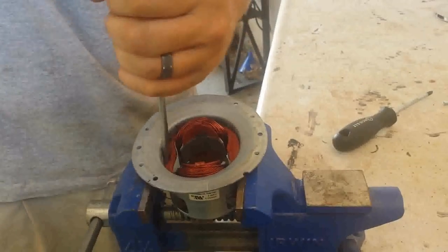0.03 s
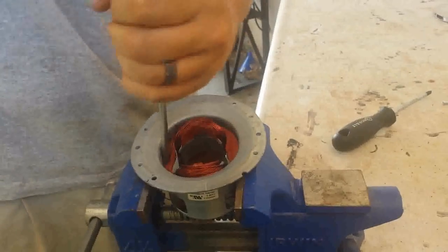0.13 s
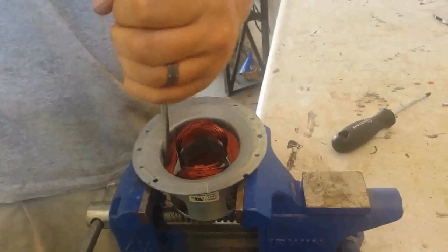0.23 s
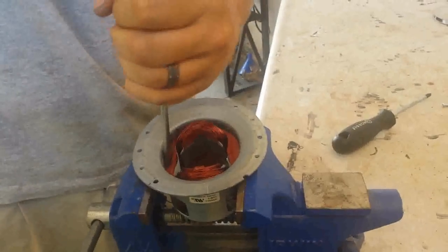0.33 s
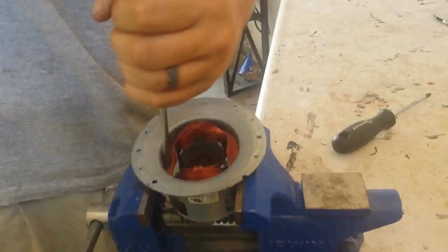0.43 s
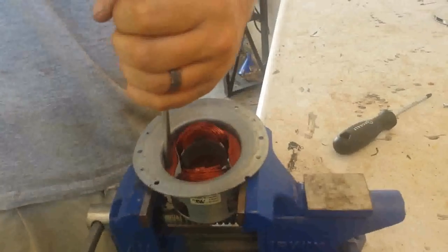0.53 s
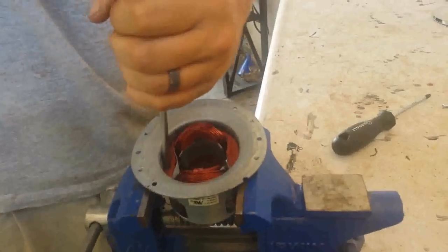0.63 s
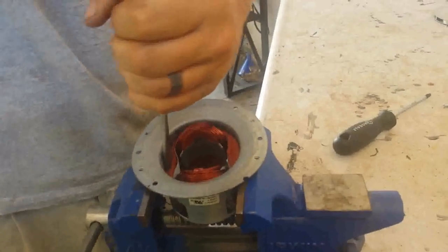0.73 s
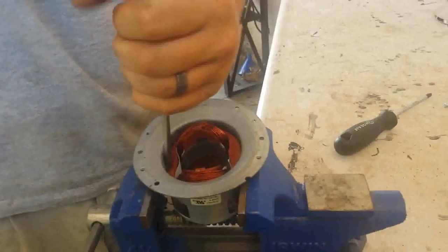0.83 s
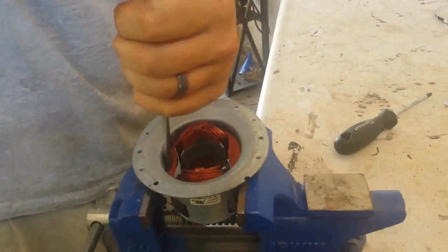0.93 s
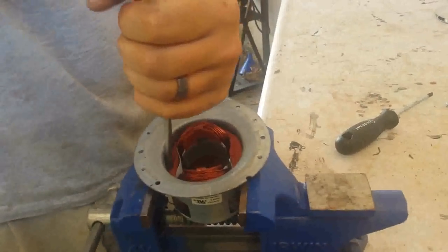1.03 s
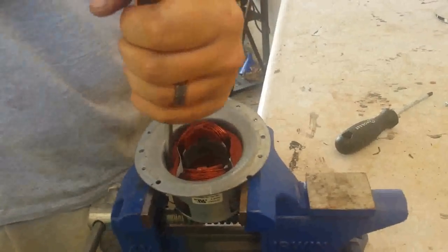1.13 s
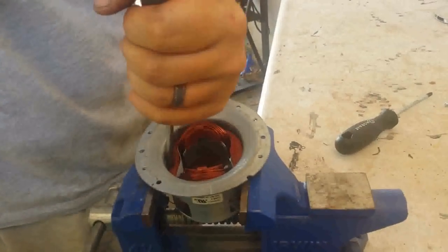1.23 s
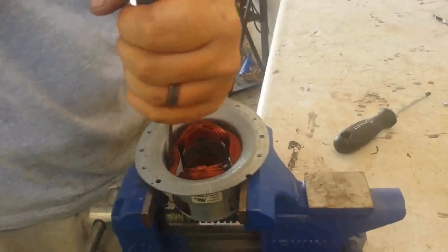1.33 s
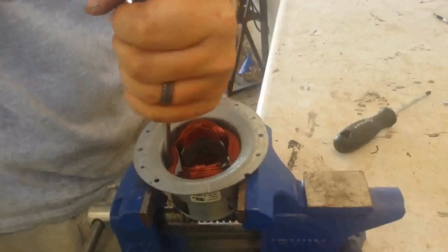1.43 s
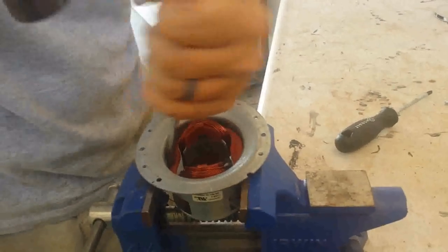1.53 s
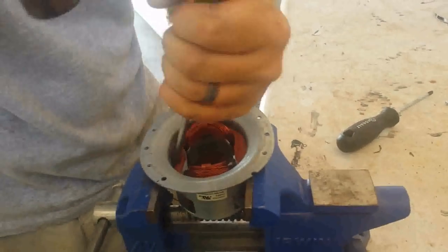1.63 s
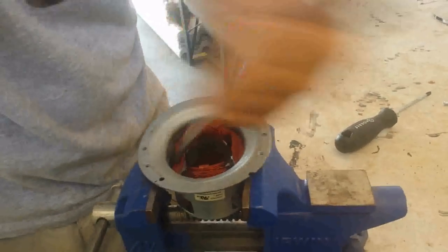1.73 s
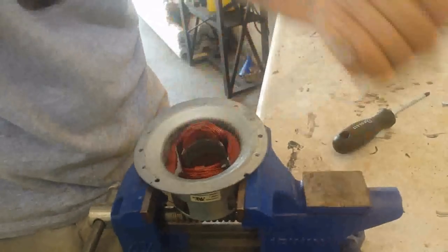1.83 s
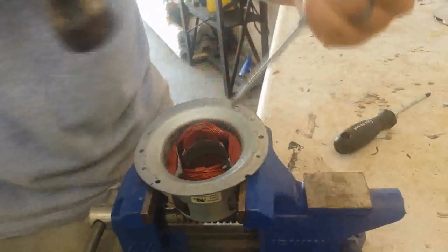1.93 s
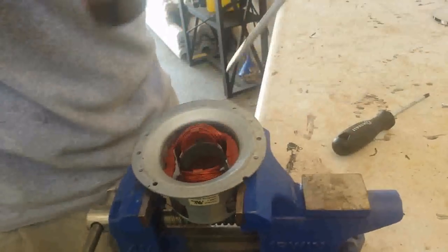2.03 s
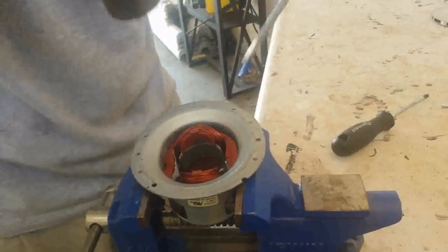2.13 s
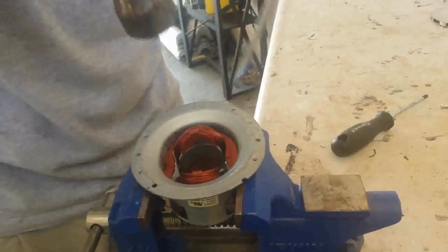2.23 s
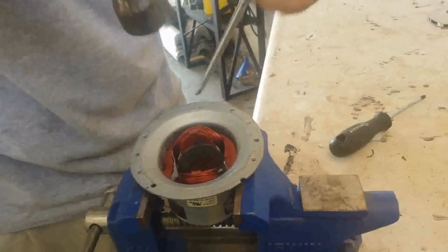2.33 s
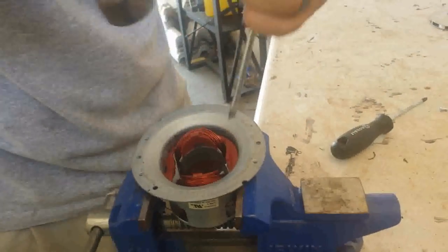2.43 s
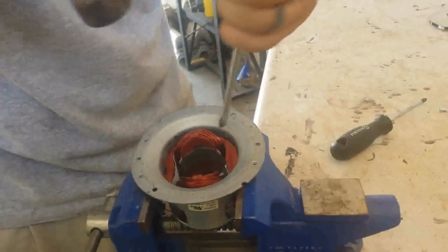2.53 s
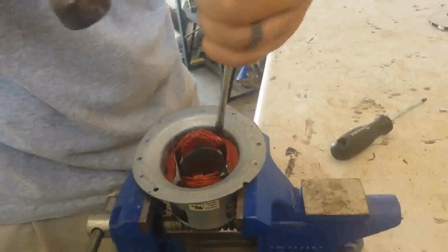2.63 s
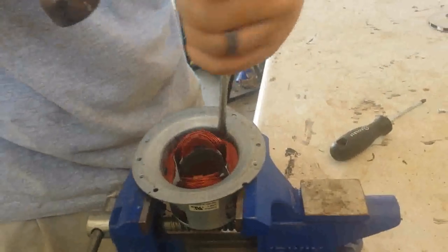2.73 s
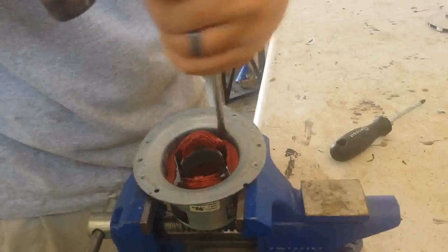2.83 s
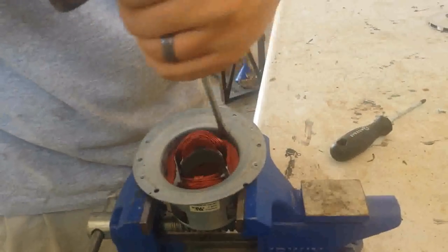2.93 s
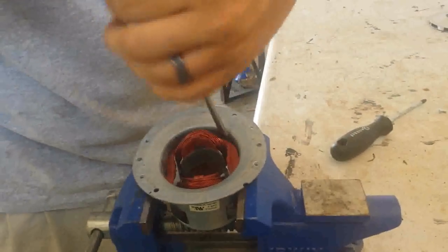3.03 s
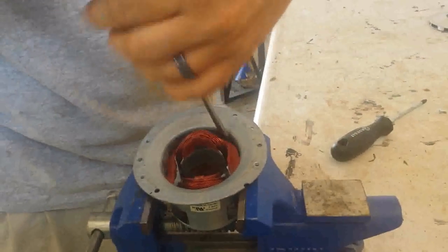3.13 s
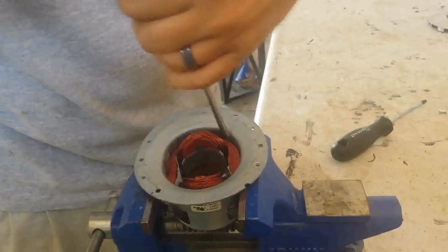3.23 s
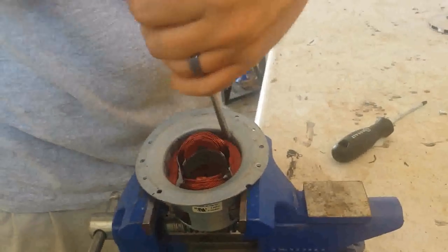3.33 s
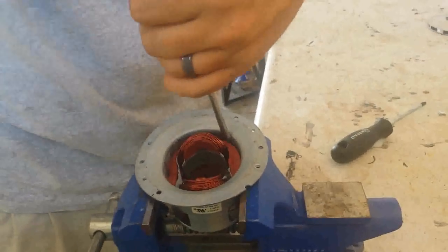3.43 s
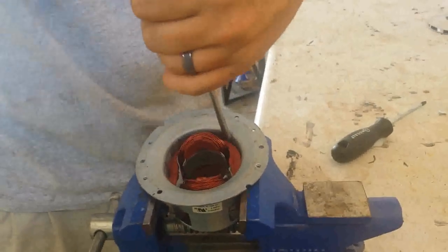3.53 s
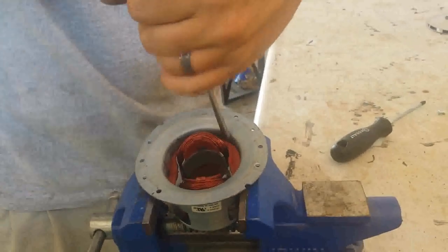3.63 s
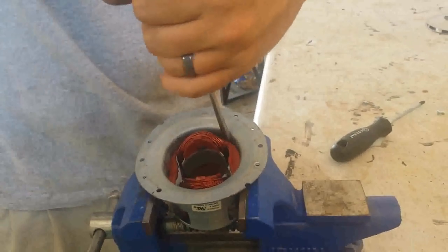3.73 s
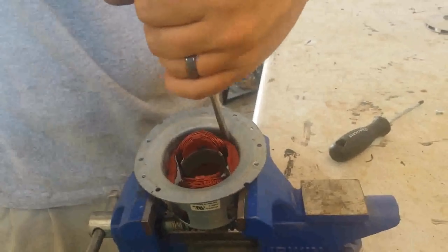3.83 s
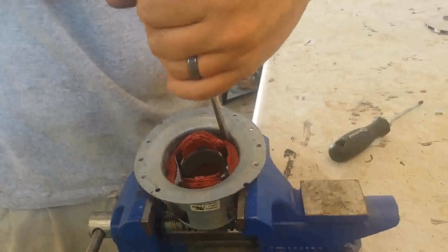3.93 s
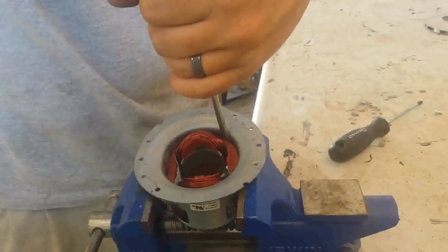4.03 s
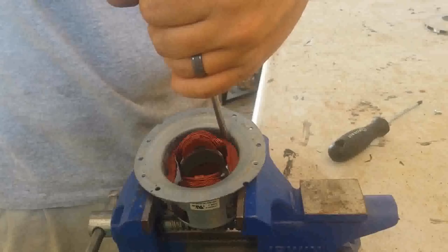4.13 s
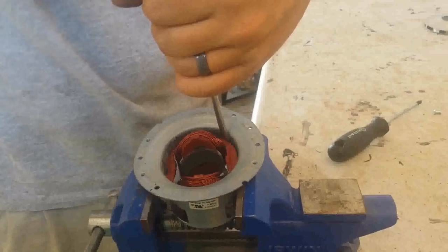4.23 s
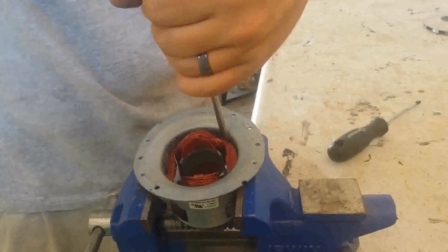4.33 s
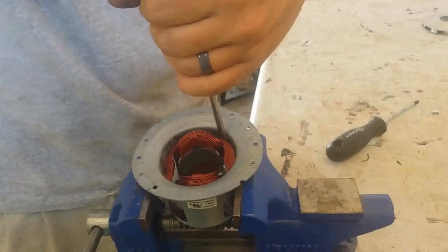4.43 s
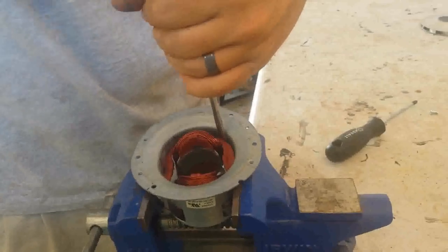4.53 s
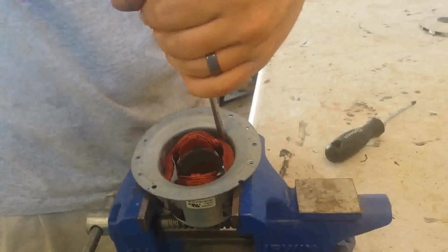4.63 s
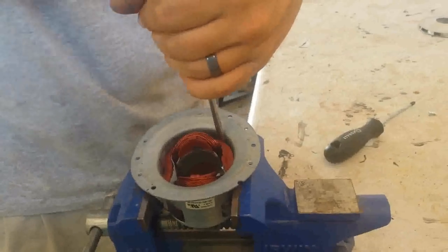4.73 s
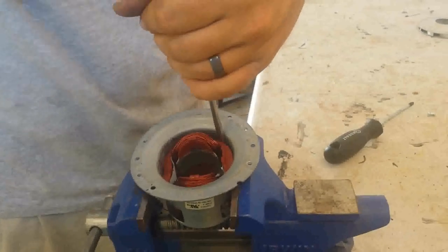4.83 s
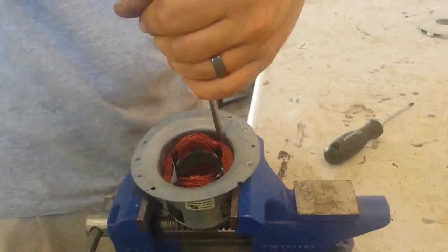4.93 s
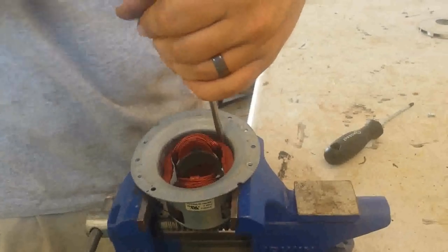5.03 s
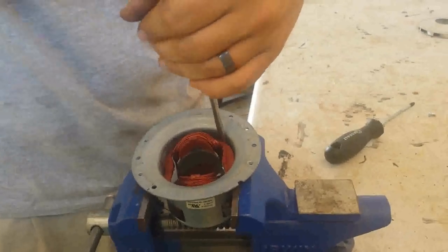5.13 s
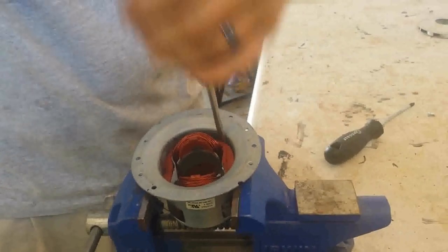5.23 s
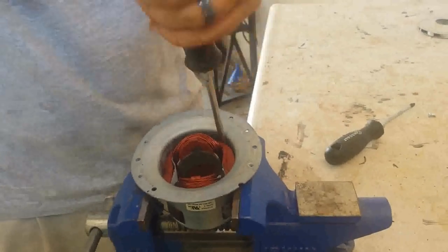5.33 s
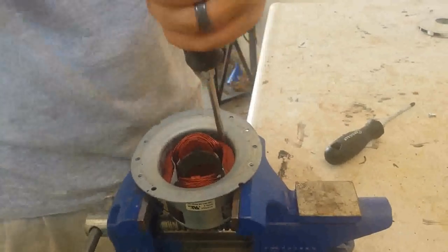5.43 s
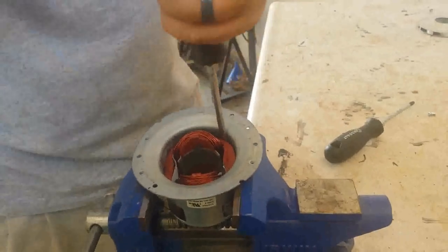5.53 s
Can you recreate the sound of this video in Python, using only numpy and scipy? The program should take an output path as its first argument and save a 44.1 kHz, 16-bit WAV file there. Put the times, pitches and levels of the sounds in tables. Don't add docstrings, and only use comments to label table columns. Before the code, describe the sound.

Very close in a small workshop, a hammer strikes a steel chisel against a metal housing held in a vise. Three even blows crack, thud through the bench and rattle loose parts. The chisel is pulled free with a bright clink, tapped on the rim and dragged lightly. A second run of six blows starts hardest and gradually weakens. A short room echo and soft outdoor wash lie behind.

```python
import sys
import numpy as np
from scipy import signal
from scipy.io import wavfile
from scipy.ndimage import uniform_filter1d

SR = 44100
rng = np.random.default_rng(int(sys.argv[2]) if len(sys.argv) > 2 else 0)


def volts_from_db(level):
    exponent = np.asarray(level, float) / 20
    return 10 ** exponent


def transcribe(signal):
    frames = np.atleast_2d(signal).T
    limited = np.clip(frames, -1, 1)
    pcm = np.round(limited * 32767).astype(np.int16)
    wavfile.write(sys.argv[1], SR, pcm)


N = 246954
LEAD = 8000
ROOMS = 2
SECOND_RUN_S = 2.0

# (time [s], crack peak [dB], bench [dB], housing shake [dB], chisel ring [dB])
BLOWS = [
    (-.072, -8, -20, -31.5, -34),
    (0.207, -6.5, -19, -33.5, -33),
    (0.487, -5, -18.5, -26.5, -49),
    (0.768, -4.5, -22.5, -29, -37.5),
    (3.735, -2, -16, -28.5, -40),
    (4.031, -7, -20, -27, -40),
    (4.304, -6, -21.5, -28.5, -24),
    (4.582, -6.5, -20, -25.5, -43),
    (4.866, -8.5, -21.5, -26, -44),
    (5.144, -10, -20.5, -25.5, -38),
]
# (time [s], peak [dB])
CHATTER = [(0.01, -21), (0.219, -11), (0.2276, -18), (0.2406, -13.5), (0.2614, -23), (0.503, -32),
           (0.516, -16), (0.541, -14.5), (0.555, -13), (0.794, -24), (0.802, -23), (0.8226, -20),
           (3.758, -38), (3.776, -13), (3.789, -16.5), (3.806, -20), (0.528, -18), (4.3078, -15),
           (4.357, -22.5), (3.796, -18), (4.055, -24), (4.0765, -17), (4.096, -18), (4.344, -23),
           (4.371, -18), (4.3974, -25), (4.616, -37), (4.655, -18), (4.8875, -35), (4.9055, -20),
           (4.9382, -22), (5.158, -17), (5.174, -38), (5.199, -18), (5.218, -20.5)]
# (time [s], length [s], level [dB], pitch [Hz])
REBOUNDS = [(-.006, 0.023, -32.5, 5250), (-.006, 0.008, -19.5, 6380), (-.006, 0.024, -33, 1974),
            (0.218, 0.007, -13, 5180), (0.228, 0.0045, -12.5, 5300), (0.242, 0.0045, -16.5, 5220),
            (0.254, 0.0062, -17.5, 5270), (0.504, 0.045, -17, 5216), (0.796, 0.025, -17, 5255),
            (3.757, 0.0049, -19, 5770), (4.075, 0.0081, -21, 5220), (4.339, 0.012, -24, 5250),
            (4.605, 0.043, -26.5, 5160), (4.886, 0.05, -21, 5200), (5.195, 0.012, -20, 5630),
            (5.215, 0.1, -45, 5670), (0.558, 0.0046, -21, 6290), (4.895, 0.01, -33, 10200),
            (.228, 0.017, -44, 10250), (2.027, 0.028, -42.5, 3350), (2.027, 0.0089, -39, 3970),
            (1.88, .09, -48.5, 11970), (1.88, 0.063, -47.5, 14300), (0.792, 0.061, -41, 10200)]
# (time [s], length [s], level [dB], sag [dB])
SWINGS = [
    (.05, .15, -44, 6),
    (.33, .15, -45, 4),
    (.95, .4, -52, 16),
    (3.78, .23, -31, 18),
    (4.1, .18, -35, 18),
    (4.36, .22, -35, 15),
    (4.64, .21, -40, 14),
    (4.98, .12, -50, 8),
    (5.38, .3, -56, 4),
]
HEAD_HZ, SWING_RISE_S, SWING_WAVER_DB = 5192, .03, 1.2
# (time [s], peak [dB], bench [dB], tick over rim [dB], fizz [s])
PULLED = [
    (1.8204, -16, -43, 9.5, 0.025),
    (1.853, -28.5, -54, 9, 0.013),
    (1.876, -6, -25.5, 16, 0.046),
    (1.909, -34, -40, 0, .04),
    (1.9502, -32, -43, 14, 0.055),
    (2.026, -37, -59, 1, .02),
]
# (time [s], peak [dB], bench [dB], tick over rim [dB], fizz [s])
SEATED = [(1.6477, -47.5, -52, 9, .012), (3.4715, -45, -60, 6, .02), (3.6291, -46, -60, 6, .012),
          (1.7016, -52, -56, 9, .012), (1.7335, -51, -58, 9, .012), (2.5725, -30, -50, 3, .01),
          (2.5748, -26, -46, 3, 0.012), (2.586, -36, -66, 2, 0.021), (2.798, -39, -68, 6, 0.011),
          (2.802, -38, -68, 6, 0.011), (2.807, -32, -44, 5, 0.025), (2.998, -40, -55, 3.7, .01),
          (3.002, -18, -43.5, 8.8, 0.015), (3.0055, -19, -48, 7, .015), (3.009, -26, -55, 5, .015),
          (3.0211, -44, -57, 4.3, 0.015)]
# (peak time [s], rise [s], fall [s], level [dB], scrape over ring [ratio])
DRAG = [
    (1.47, 0.026, .05, -64, 0.69),
    (1.722, 0.076, 0.04, -52.5, 1.2),
    (2.592, 0.012, 0.039, -39, 0.15),
    (2.682, 0.029, 0.018, -43.5, 0.25),
    (2.735, 0.012, 0.017, -44.5, 0.17),
    (2.805, 0.013, 0.012, -37.5, 0.57),
    (3.476, 0.027, 0.065, -44, 4.6),
    (3.63, 0.036, 0.027, -49.5, 4.0),
]
# (time [s], top [dB], legs [dB])
NUDGES = [
    (1.643, -47, -64),
    (1.827, -48, -40),
    (1.885, -42, -41.5),
    (3.094, -44, -68),
]
# (time [s], peak [dB], thinness [0-1])
GRIT = [
    (4.7727, -37, 1.),
    (3.0025, -30, 1.),
    (3.007, -33, 1.),
    (2.574, -44, 1.),
]

# (pitch [Hz], level [dB])
CRACK = [(410, -36), (700, 4.5), (1960, -5.5), (3160, -7), (3750, -2.5), (5020, -4), (6040, 2.5),
         (9100, -17), (12200, -49), (14300, -16.5), (16500, -56)]
SHAKE = [(290, -12), (500, 1), (1220, -16.5), (2650, -3.5), (3930, -11.5), (4830, -10.5), (5350, -5.5),
         (5840, -12.5), (7490, -7.5), (8420, -12.5), (14500, -40), (15600, -57.5), (16500, -106)]
THUD = [(35, -39), (60, -30), (103, -8.5), (176, 0.5), (243, 4), (786, -5), (962, -12), (1040, -5),
        (1500, -15.5), (1950, -56), (3300, -120)]
CLINK = [(290, -50.5), (500, -16.5), (1290, -24), (2040, -13.5), (2890, -11), (3500, -4.5), (6560, -4.5),
         (9190, -7), (14900, -37), (16500, -51)]
TAP = [(500, -59), (900, -37.5), (2200, -5.5), (3000, -10), (4300, 2), (5200, -9), (6000, 4), (8400, -13),
       (13200, -38.5), (16500, -56.5)]
CHIP = [(3000, -40), (7500, 0), (14500, -4), (16500, -30)]
SCRAPE = [(500, -28), (1000, -22.5), (2000, 2), (3000, -2), (5500, -1.5), (8000, -7), (12000, -46),
          (16500, -44.5)]
# (pitch [Hz], level [dB])
FIZZ = [(11800, 0), (12400, 2), (12700, -25), (13700, -25), (14100, 4), (14600, 2), (14900, -25)]

# (pitch [Hz], level [dB], time to die by 60 dB [s])
BENCH = [(178, -7, 0.33), (230.2, 6.5, 0.35), (261.1, -2, 0.45), (316, 4.5, 0.26), (356.6, 0.5, 0.44),
         (429.4, -3.5, 0.28), (470.3, 5, 0.12), (553, -15.5, 0.69), (619, -8.5, 0.49), (756, -5, 0.18),
         (842, -11, 0.25), (962, 3.5, 0.2), (1130, 13, 0.053), (1295, 0, 0.11)]
LEGS = [(96, -33, 0.13), (118.7, -4.5, 0.4), (133.7, -1, 0.38)]
FRAME = [(386, 4.5, 0.85), (475, -2.5, 0.9), (567, 1, 1.2), (655, -10, 1.5)]
SHANK = [(1987, 0, .07)]
STEEL = [(7980, 10.5, .2), (8640, -11.5, .2), (8800, -8.5, .2), (10200, 1.5, 0.26), (10700, -10, .18),
         (11800, -6, .15), (12270, -12, 0.2), (13540, -11.5, 0.192), (14100, -10.5, .2), (14500, -9.5, .18)]
LINGER = [(4360, 0, 1.2)]
LOOSE = [(5300, -2, .015), (6400, -1, 0.02), (6900, -2, .015), (7400, -5, .012)]
DULL = [(2300, -5, .012), (2563, 2, .016), (2790, 3, 0.04), (3000, 5, 0.02), (3250, 1, 0.014),
        (4300, -2, 0.018)]
BRIGHT = [(7650, 13, 0.014), (8400, 2, .012), (8810, 3, 0.02), (10300, -2, 0.02), (11100, -1, .012),
          (12400, -7, .012)]
RIM_FREE = [(2670, -7, .015), (3020, -4, .02), (3770, 0, .025), (4580, -2, .02), (5410, -1, .015),
            (5820, 0, .025), (6560, -1, .012), (7490, -4, .02), (8630, -9, .015), (12300, -14, .03),
            (14400, -18, .03)]
RIM_HELD = [(950, -12, .04), (1110, -8, .04), (1960, -7, .035), (2130, -8, .035), (2480, -7, .03),
            (3370, -8, .04), (3950, -3, .04), (4340, -3, .035), (5330, -8, .03), (5800, -3, .03),
            (6020, -4, .04), (7100, -11, .02)]

# (pitch [Hz], time to die by 60 dB [s])
ROOM = [(100, 0.83), (260, 0.91), (700, 0.7), (1840, 0.57), (4850, 0.36), (12800, 0.35)]
# (time [s], hiss [dB])
WASH = [(0, -50.5), (1.2, -60), (1.601, -64), (1.66, -59.5), (1.8, -53.5), (2.1, -68), (2.449, -70.5),
        (2.98, -55), (3.03, -49.5), (3.25, -48.5), (3.5, -46), (3.72, -43.5), (3.9, -53.5), (5.6, -56)]
# (pitch [Hz], level [dB])
HISS = [(180, -17.5), (300, -3), (700, -6), (1200, -4), (2500, -6.5), (5000, -8), (8000, -16), (11000, -23),
        (15300, -26), (16500, -60)]
RUMBLE = [(12, -64), (20, -17), (54, -8), (75, -18), (144, 2), (169, 1), (201, -13.5), (222, -9.5),
          (264, -9), (357, -11), (549, -20.5), (900, -18.5), (1170, -51.5), (1980, -120)]
STILL = [(180, -23.5), (300, -4.5), (820, -6.5), (907, -3.5), (1060, -4.5), (1900, -11), (2280, -6),
         (2610, -12), (4540, -7.5), (11800, -27), (14900, -24), (16500, -47.5)]
# (pitch [Hz], level [dB])
HUM = [(172.3, -61.5), (1550, -79), (2358, -78.5), (2912, -79.5), (4425, -80), (7768, -84)]
# (pitch [Hz], likeness [0-1])
SAME = [(60, 0.94), (150, 0.7), (380, 0.8), (950, 0.45), (2380, 0.), (5980, 0.1), (15000, 0.1)]
# (pitch [Hz], gain on the left [dB]); the right gets a third of it,
# reversed
LEAN = [(60, -1.5), (240, 1.5), (480, 0.5), (950, 1.5), (1890, 6), (3500, 5.5), (5500, 8), (8500, -7.5),
        (15000, -27)]
# (pitch [Hz], level [dB])
DIPS = [(8000, 0), (8500, -6), (8950, 0), (12400, 1), (13000, -11), (13700, -2), (14300, -3), (15400, -5)]

SHANK_DB, LEGS_DB, FRAME_DB = (-8.5, -17.5), (-9, -5), (-21, -25.5)
HARD_DB, BRIGHT_DB = (13.5, 2), (-13.5, -11.5)
BODY_DB = (-2, 0.5)

JOLT_DB = 2.2
KNOCK_SPREAD_DB = 4.5
FLIGHT_SAG_DB = 9
DRAG_EDGE_DB = 12.5
LEGS_RISE_S, LEGS_EXTRA_DB = 0.0072, 1
LINGER_DB = -47
LAST_BLOW_DB = 6
WIDE_DB = 3.5
GAP_HZ, GAP_DB = np.arange(8000, 15600, 220), 7
STILL_DB, RUMBLE_DB, RUMBLE_FOLLOWS = -60.5, -47.5, 0.62
RING_ROOM_DB = -22
LEFT_LAG = 1
CEILING, EDGE_HZ = .86, 16350


def read(points, hz):
    f, value = np.transpose(points)
    return np.interp(np.log(hz + 1), np.log(f + 1), value)


def evened(x):
    return x / np.sqrt(np.mean(x ** 2) + 1e-20)


def peaked(x):
    return x / abs(x).max()


def wandering(size, width):
    return evened(uniform_filter1d(uniform_filter1d(rng.standard_normal(size), width), width))


def add(mix, s, sound):
    part = mix[..., round(s * SR) + LEAD:][..., :sound.shape[-1]]
    part += sound[..., :part.shape[-1]]


def colour(x, points, scale=1):
    hz = abs(np.fft.fftfreq(4096, 1 / SR))
    log_gain = np.log(volts_from_db(np.maximum(scale * read(points, hz), -100)))
    taps = np.fft.ifft(np.exp(np.conj(signal.hilbert(log_gain)))).real[:2048]
    return signal.oaconvolve(x, taps)[:len(x)]


def ring(modes, stretch=1, spread_db=0., detune=0., size=20000):
    hz, db, t60 = np.transpose(modes)[:, :, None]
    t = np.arange(size) / SR
    luck = rng.standard_normal((len(modes), 3)).T[:, :, None]
    level = volts_from_db(db + spread_db * luck[0] - 60 * t / (stretch * t60))
    tones = np.sin(2 * np.pi * hz * (1 + detune * luck[1]) * t)
    return (level * np.sign(luck[2]) * tones).sum(0)


def burst(rise, fall, grain_db, size=8000):
    t = np.arange(size) / SR
    grit = volts_from_db(grain_db * evened(uniform_filter1d(rng.standard_normal(size), 60)))
    noise = evened(rng.standard_normal(size) * grit)
    return noise * (1 - np.exp(-t / rise)) * np.exp(-t / fall) * (1 - t / t[-1])


def swelling(x, rise, rough_db):
    t = np.arange(len(x)) / SR
    x = x * (1 - np.exp(-t / rise)) * volts_from_db(rough_db * wandering(len(x), 300))
    return x / np.std(x[:3000])


def wash():
    frames, hz = N // 256 + 5, np.fft.rfftfreq(1024, 1 / SR)
    a, b, c, d, patches = rng.standard_normal((frames, 513, 5)).T
    patches = evened(uniform_filter1d(uniform_filter1d(patches, 10, 0), 12, 1))
    hiss_db = np.interp(np.arange(frames) * 256 / SR, *np.transpose(WASH))
    rumble_db = RUMBLE_DB + RUMBLE_FOLLOWS * (hiss_db + 56.5)
    layers = ((STILL, STILL_DB + 0 * hiss_db), (HISS, hiss_db), (RUMBLE, rumble_db))
    power = sum((evened(volts_from_db(read(shape, hz)))[:, None] * volts_from_db(db)) ** 2 for shape, db in layers)
    same = read(SAME, hz)[:, None]
    left = a + 1j * b
    right = same * left + np.sqrt(1 - same ** 2) * (c + 1j * d)
    unit = np.std(signal.istft(left, nperseg=1024, noverlap=768)[1])
    bands = np.array([left, right]) * np.sqrt(power) * volts_from_db(1.5 * patches)
    air = signal.istft(bands, nperseg=1024, noverlap=768)[1][:, :N] / unit
    time = np.arange(N) / SR
    return air + sum(volts_from_db(db + 4) * np.sin(2 * np.pi * (f * time + rng.random())) for f, db in HUM)


def lingering():
    return volts_from_db(LINGER_DB) * swelling(ring(LINGER, size=12000), 0.0089, 6.5)


def shake(db):
    out = colour(burst(0.012, 0.054, 2.8, size=16000), SHAKE)
    return volts_from_db(db) * out / np.std(out[:3000])


def blow(crack_db, shake_db):
    out = shake(shake_db)
    snap = burst(0.0002, 0.0019, 2.5) + 0.11 * burst(0.0012, 0.011, 0.96)
    snap[8] += 2.5 * abs(snap).max()
    out[:8000] += volts_from_db(crack_db + 10.5) * peaked(colour(snap, CRACK))
    return out


def gapped(x):
    db = GAP_DB * (1 - np.minimum(rng.exponential(1, len(GAP_HZ)), 4))
    fade_in = np.clip((GAP_HZ - GAP_HZ[0]) / 400, 0, 1)
    return colour(x, np.transpose([GAP_HZ, db * fade_in - 2 * (GAP_HZ > GAP_HZ[0])]))


def seated(x, run):
    return colour(x, [(450, 0), (650, BODY_DB[run]), (1000, BODY_DB[run]), (1500, 0)])


def thud():
    dense = colour(burst(0.05, 0.035, 5.55, size=20000), THUD)
    return dense / np.std(dense[:3000])


def bench(top_db, legs_db):
    top = swelling(ring(BENCH, spread_db=2.0, detune=0.008), 0.008, JOLT_DB) + 1.07 * thud()
    legs = swelling(ring(LEGS, spread_db=1.5, detune=0.01), LEGS_RISE_S, 0.8)
    return volts_from_db(top_db - 2.5) * top + volts_from_db(legs_db + LEGS_EXTRA_DB) * legs


def shank(run):
    return volts_from_db(SHANK_DB[run]) * ring(SHANK, spread_db=0.5, detune=0.0036, size=6000)


def chisel_ring(db):
    tones = ring(STEEL, spread_db=1.5, detune=0.0067, size=12000)
    return swelling(tones, .02, 2.5) * volts_from_db(0.9 * db - 44)


def frame_hum(db):
    return volts_from_db(db) * swelling(ring(FRAME, size=36000), 0.081, 0.49)


def rebound(flight, db, hz):
    t = np.arange(0, flight + 0.026, 1 / SR)
    landed = np.maximum(t - flight, 0)
    held = np.minimum(t / 0.0032, 1) * volts_from_db(-FLIGHT_SAG_DB * t / flight - 1200 * landed)
    pair = np.sin(2 * np.pi * hz * t) + .3 * np.sin(2 * np.pi * (1.024 * hz * t + rng.random()))
    return volts_from_db(db + 7.0) * held * pair


def workshop(x):
    taps = np.zeros((2, SR))
    slots = np.arange(300, SR - 20, 20)
    at = slots + rng.integers(0, 20, (2, len(slots)))
    np.put_along_axis(taps, at, rng.choice([-1., 1.], at.shape), 1)
    hz, t, z = signal.stft(taps, SR, nperseg=512)
    alike = np.clip(1 - hz / 1000, 0, 1)[:, None]
    z[1] = alike * z[0] + np.sqrt(1 - alike ** 2) * z[1]
    tail = signal.istft(z * volts_from_db(-60 * t / read(ROOM, hz)[:, None]), SR, nperseg=512)[1]
    return signal.fftconvolve(x[None], tail / np.linalg.norm(tail[0]), axes=1)[:, :len(x)]


def knock(db, run):
    loose_db, bright_db = np.array([HARD_DB[run], BRIGHT_DB[run]]) + KNOCK_SPREAD_DB * rng.standard_normal(2)
    parts = ring(DULL, .7, spread_db=2., detune=.02, size=2000)
    parts += volts_from_db(loose_db) * ring(LOOSE, .7, spread_db=2., detune=.02, size=2000)
    parts += volts_from_db(bright_db) * ring(BRIGHT, .7, spread_db=2., detune=.02, size=2000)
    smear = burst(.001, .01, 2., size=1500)
    return volts_from_db(db + 5.0) * peaked(signal.fftconvolve(parts, smear))


def swing(length, db, sag_db):
    t = np.arange(0, length, 1 / SR)
    waver = wandering(30000, 700)[:len(t)]
    ends = np.clip(np.minimum(t, length - t) / SWING_RISE_S, 0, 1)
    level = volts_from_db(db + SWING_WAVER_DB * waver - sag_db * (t / length) ** 1.5)
    return ends * level * np.sin(2 * np.pi * HEAD_HZ * t)


def drag(s, rise, fall, db, scrape):
    t = np.arange(-.12, .12, 1 / SR)
    slips = rng.standard_normal(len(t)) * (rng.random(len(t)) < 3000 / SR)
    rim = ring(RIM_HELD, .7, spread_db=2., detune=.008, size=3000)
    rub = signal.fftconvolve(slips, rim)[:len(t)]
    push = volts_from_db(db - DRAG_EDGE_DB * np.where(t < 0, -t / rise, t / fall))
    return s + t[0], push * evened(evened(rub) + scrape * evened(colour(slips, SCRAPE)))


def nudge(db, legs_db):
    return volts_from_db(db) * thud() + volts_from_db(legs_db) * swelling(ring(LEGS, 0.44), 0.011, 1.5)


def clink(modes, edge, db, body_db, bright_db, fizz):
    snap = burst(.00015, .0025, 3.)
    snap[4] += 1.5 * abs(snap).max()
    tick = peaked(colour(snap + 0.12 * colour(burst(0.0009, fizz, 1.3), FIZZ), edge))
    rim = ring(modes, .9, spread_db=1.5, detune=.008, size=4000)
    rim = peaked(signal.fftconvolve(rim, burst(.0002, .0008, 2., size=4001)))
    body = signal.fftconvolve(burst(0.0027, 0.03, 1.8), ring(BENCH, 0.71, spread_db=4., size=4000))[:8000]
    return volts_from_db(db) * (rim + volts_from_db(bright_db) * tick) + volts_from_db(body_db - 8.5) * body / np.std(body[:2000])


def chip(db, thin):
    return volts_from_db(db) * peaked(colour(burst(.001, .009, 3.), CHIP, thin))


def scene():
    dry, close = np.zeros((ROOMS, N + LEAD)), np.zeros(N + LEAD)
    steel, wide = np.zeros((2, N + LEAD))
    add(steel, BLOWS[0][0], lingering())
    for k, (s, crack_db, top_db, shake_db, ring_db) in enumerate(BLOWS):
        run = int(s > SECOND_RUN_S)
        wait = min([later[0] - s for later in BLOWS[k + 1:]], default=1)
        last = wait > .5
        add(dry[k % ROOMS], s, seated(gapped(blow(crack_db, shake_db)), run))
        add(close, s, seated(bench(top_db, top_db + LEGS_DB[run]), run))
        add(steel, s, shank(run))
        add(steel, s, chisel_ring(ring_db))
        add(wide, s, gapped(shake(shake_db + WIDE_DB)))
        add(steel, s, frame_hum(top_db + FRAME_DB[run] + LAST_BLOW_DB * last))
    for s, *rest in REBOUNDS:
        add(steel, s, rebound(*rest))
    for s, *rest in SWINGS:
        add(steel, s, swing(*rest))
    for s, *rest in GRIT:
        add(close, s, chip(*rest))
    for s, db in CHATTER:
        add(close, s, knock(db, int(s > SECOND_RUN_S)))
    for s, *rest in PULLED:
        add(close, s, clink(RIM_FREE, CLINK, *rest))
    for s, *rest in SEATED:
        add(close, s, clink(RIM_HELD, TAP, *rest))
    for s, *rest in NUDGES:
        add(close, s, nudge(*rest))
    for row in DRAG:
        add(close, *drag(*row))
    near = dry.sum(0) + close + steel
    high = signal.sosfilt(signal.butter(2, 900, "high", fs=SR, output="sos"), near)
    left = near + 0.15 * np.roll(high, 37) - 0.26 * np.roll(high, 95) + wide
    right = near - 0.26 * np.roll(high, 16) + 0.47 * np.roll(high, 61) - wide
    direct = np.array([np.roll(left, LEFT_LAG), right])
    dry[1] += volts_from_db(-5.5) * close + volts_from_db(RING_ROOM_DB) * steel
    work = direct + volts_from_db(-5.0) * sum(workshop(x) for x in dry)
    left, right = [colour(x, DIPS) for x in work]
    sides = np.array([colour(left, LEAN, 1.0), colour(right, LEAN, -0.34)])
    return sides[:, LEAD:] + wash()


def roll_off(x):
    return signal.sosfilt(signal.butter(12, 16660, fs=SR, output="sos"), x)


def record(dry):
    mid, side = (dry[0] + dry[1]) / 2, (dry[0] - dry[1]) / 2
    side = signal.sosfiltfilt(signal.butter(1, 240, "high", fs=SR, output="sos"), side)
    dry = signal.sosfilt(signal.butter(2, 55, "high", fs=SR, output="sos"), [mid + side, mid - side])
    power_db = 10 * np.log10(abs(uniform_filter1d((dry ** 2).mean(0), 200)) + 1e-12)
    recovery = np.arange(N) * 120.0 / SR
    over_db = np.maximum(np.maximum.accumulate(power_db + recovery) - recovery + 12.5, 0)
    onset = np.arange(N) * 350. / SR
    ahead_db = np.maximum.accumulate((over_db - onset)[::-1])[::-1] + onset
    held = dry / volts_from_db(0.17 * uniform_filter1d(ahead_db, 100))
    rounded = CEILING * np.tanh(0.96 * held)
    held = signal.oaconvolve(rounded, signal.firwin(255, EDGE_HZ, fs=SR)[None], "same")
    return roll_off(held)


dry = scene()
out = record(dry)
transcribe(out)
```